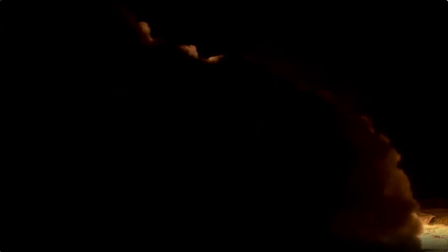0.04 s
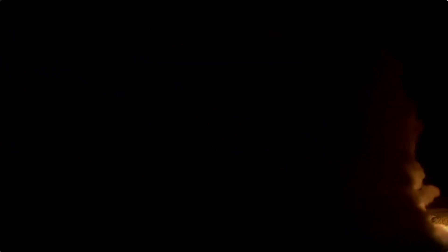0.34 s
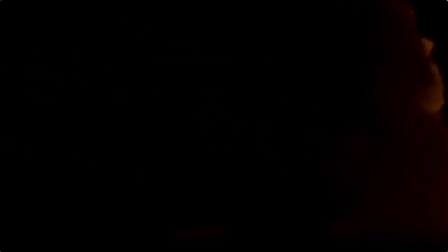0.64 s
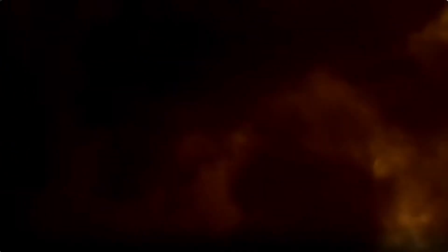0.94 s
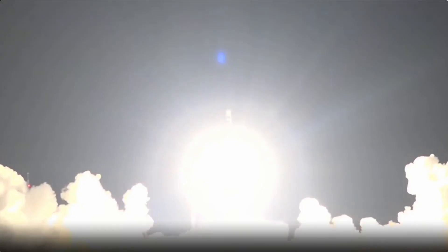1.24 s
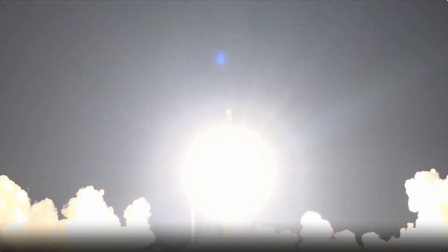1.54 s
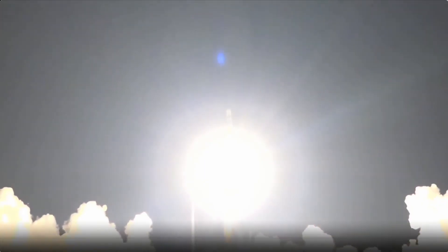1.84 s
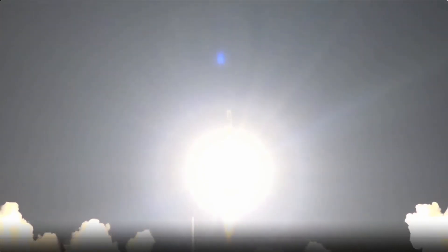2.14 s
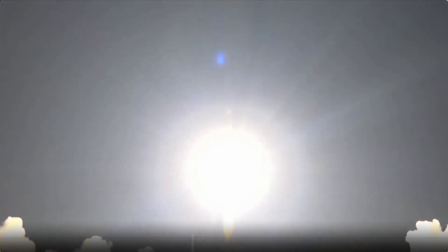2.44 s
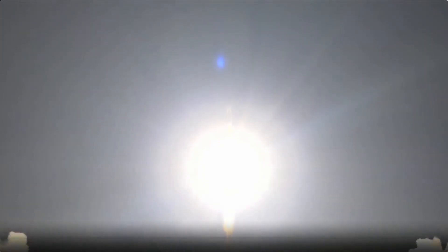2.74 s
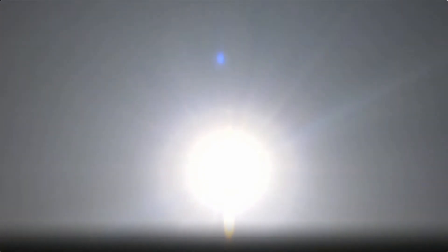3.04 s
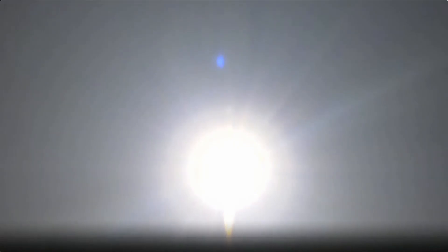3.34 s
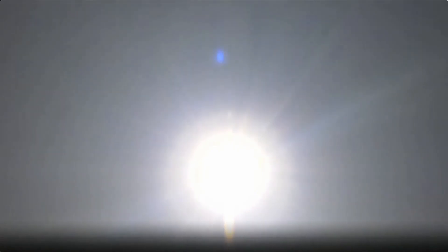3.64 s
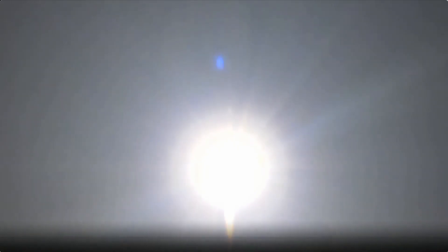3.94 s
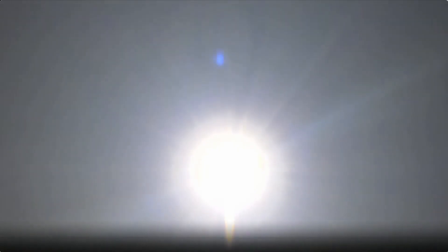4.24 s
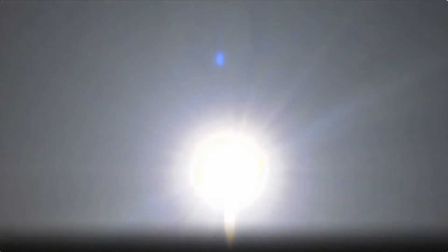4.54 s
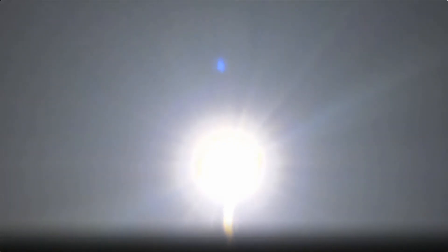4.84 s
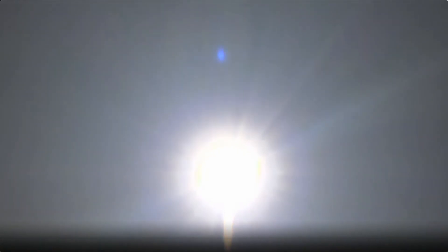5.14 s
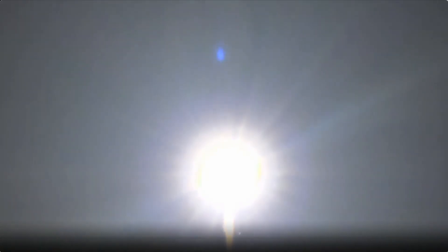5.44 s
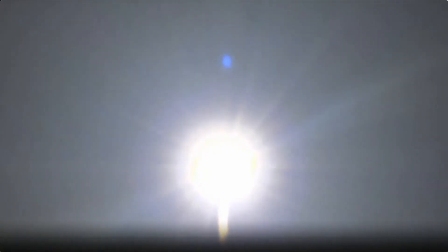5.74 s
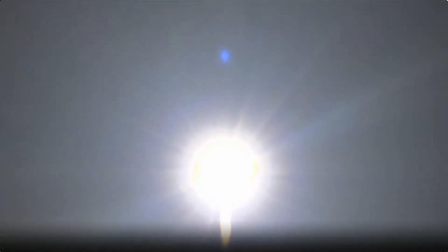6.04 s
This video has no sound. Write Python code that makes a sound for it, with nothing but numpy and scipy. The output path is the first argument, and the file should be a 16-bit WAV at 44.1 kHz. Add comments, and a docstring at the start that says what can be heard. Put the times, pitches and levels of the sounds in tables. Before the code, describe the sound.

A rocket's engines roar at liftoff outdoors, heard through an overloaded microphone. The rushing noise starts with a pop, cuts out after about a second and stutters back with a few more pops. It then runs unbroken, growing fuller and deeper as the rocket clears the steam. Sharp crackles and brief low thumps run through the roar, and its tone sweeps slowly downward.

```python
"""A rocket's exhaust roars as it lifts off at night, at first scattered by the pad and the steam cloud,
then more and more directly, crackling with small shocks (sudden jumps in air pressure). The echo off
the ground lags further as the rocket climbs, so the roar's tone sweeps down. A fast limiter holds the
overloaded microphone's level down; early on the signal keeps cutting out and coming back with a pop."""
import sys
import numpy as np
from scipy import signal
from scipy.fft import rfft, irfft, next_fast_len
from scipy.io import wavfile
from scipy.ndimage import uniform_filter1d, minimum_filter1d, map_coordinates

SR = 44100
rng = np.random.default_rng(int(sys.argv[2]) if len(sys.argv) > 2 else 0)


def master_out(mix):
    """Clip the mix to full scale and print it as 16-bit PCM to the path in sys.argv[1]."""
    frames = np.transpose(np.atleast_2d(mix))
    ceiling = np.clip(frames, -1, 1)
    pcm = np.round(ceiling * 32767).astype(np.int16)
    wavfile.write(sys.argv[1], SR, pcm)


N = 269010
TOP_HZ = 15600  # the treble ends here


def exhaust():
    """The roar: the jet of hot gas rises out of the steam, and each band of pitch has its own loudness."""
    # the climb: (time [s], share of the sound that arrives directly [0-1], ground echo lag [ms])
    climb = [(.1, 0.1, 2.83), (1.5, 0, 2.94), (2.3, 0.12, 3), (3.0, 0.39, 3.42), (3.65, 0.48, 3.82),
             (3.9, .5, 4.34), (4.2, 0.54, 4.42), (4.6, 0.64, 4.97), (5.0, .72, 5.34), (5.4, 0.82, 5.7),
             (6.1, 0.91, 6.03)]
    # the roar's tone before each band's loudness is set: (frequency [Hz], level [dB])
    tone = [(15, -29), (42, -18.5), (80, -2), (150, 3.5), (300, -1.5), (500, -6), (860, -11.5), (1100, -14),
            (2400, -21.5), (3300, -23.5), (5200, -25), (7200, -27.5), (9000, -34.5), (10800, -34.5),
            (13500, -40.5), (15200, -39.5)]
    # how much louder the left side is: (frequency [Hz], left minus right [dB])
    balance = [(40, 2.5), (130, 2), (400, 3), (1000, 1.2), (3000, 0.5), (12000, 0.5)]
    # where the bands rumble, boom, roar, rush, hiss and fizz end: (upper edge [Hz])
    edges_hz = [75, 150, 700, 3950, 9000, TOP_HZ]
    share, lag_ms = curves(climb)
    roar = np.sqrt(share) * direct_roar(lag_ms) + np.sqrt(1 - share) * scattered_roar()
    roar += low_hump(width_hz=144, strength_db=-23.5)
    lean = lambda hz: amp(np.outer([.5, -.5], along(balance, hz)))
    rest = filtered(roar, lambda hz: keep_sharp(amp(along(tone, hz))) * mic_hollows(hz) * lean(hz))
    out = np.zeros((2, N))
    for edge_hz, db in zip(edges_hz, band_levels()):
        band = filtered(rest, lambda hz: below(hz, edge_hz, order=12))
        rest = rest - band
        power = uniform_filter1d(band.mean(axis=0) ** 2, size=SR // 2)
        out += amp(db) * band / np.sqrt(np.abs(power))  # even the band out, then set its level
    return out


def direct_roar(lag_ms):
    """Swirling gas in the bass and shocks in the treble, heard straight and once more off the ground."""
    # how much the ground reflects: (frequency [Hz], level [dB], capped at 0 below)
    ground = [(90, -6), (130, -7), (185, -1.5), (250, 0.5), (560, -1), (900, -6.5), (1600, -8), (5000, -15)]
    # smooth noise as against shocks: (frequency [Hz], share of noise [0-1])
    smooth = [(200, 0.88), (1000, 0.48), (2500, 0.27), (7000, .08), (13000, 0.39)]
    shocks = crackle(per_second=1250, spread_db=6.0, waver_db=0.86, sides_db=2.0)
    jet = filtered(rng.standard_normal(N), lambda hz: np.sqrt(along(smooth, hz)))
    jet = jet + filtered(shocks, lambda hz: np.sqrt(1 - along(smooth, hz)))
    bounce = filtered(jet, lambda hz: np.minimum(amp(along(ground, hz)), 1))
    delayed_index = np.arange(N) - lag_ms * SR / 1000
    return jet + np.array([map_coordinates(side, [delayed_index]) for side in bounce])


def scattered_roar():
    """Pad and steam scatter the roar, so it comes from all round, blurred into smooth noise."""
    # how they change its tone: (frequency [Hz], level [dB])
    tone = [(35, -16.5), (95, 2.5), (135, -3), (210, -1.5), (340, 1), (520, 1.5), (850, -.5), (3200, 2),
            (5200, 6), (6800, 4), (12000, 6)]
    # how alike the two sides are: (frequency [Hz], likeness [-1 to 1])
    likeness = [(30, .4), (100, 0.68), (300, 0.75), (650, 0.68), (1100, .68), (2000, 0.51), (3900, 0.62),
                (5200, 0.2), (7000, -0.017), (15000, -0.28)]
    angle = lambda hz: np.arccos(along(likeness, hz)) / 2
    gains = lambda hz: amp(along(tone, hz)) * np.array([np.cos(angle(hz)), np.sin(angle(hz))])
    common, opposite = filtered(rng.standard_normal((2, N)), gains)
    return np.array([common + opposite, common - opposite])


def band_levels(emerges_s=0.81, clear_s=1.98, flutters_per_s=17):
    """A dB curve per band: the roar fills out as it clears the steam, then fades, top treble fastest."""
    # the bands, low to high: (level on the pad [dB], level clear of the steam [dB], fade [dB/s],
    # share of the swells [0-1], lift in a rasp [dB], flutter from swirling gas [dB])
    bands = [(-45.5, -45, -0.2, 0.12, 2, 1), (-32.5, -35, -1, 0, 0, 0.35), (-26.5, -20, 0.92, 0, 0, .5),
             (-26.5, -28, 1.25, 0.4, 0.37, 0.43), (-38.5, -42, 0.98, 0.9, -0.3, 0.5),
             (-48, -47.5, 1.95, 0.93, -0.5, 0.5)]
    # the middle of each band: (frequency [Hz])
    centres_hz = [55, 110, 330, 1700, 6000, 12000]
    # the treble swells and sinks in slow waves: (time [s], level [dB])
    swells = [(.35, -1.5), (.75, -2.5), (1.5, -0.5), (2.2, 1), (2.66, 0.3), (2.81, -1.5), (2.95, -2),
              (3.35, -1), (3.52, -2), (3.64, 1), (3.98, -1), (4.15, 1.5), (4.38, 1.5), (4.52, -2),
              (4.74, 0.5), (4.93, 1.5), (5.08, -2.5), (5.22, -3.5), (5.35, 1.2), (5.6, 2), (5.8, 1),
              (5.99, -1), (6.08, 0.5)]
    cleared, = curves([(emerges_s, 0), (clear_s, 1)])
    climb_s = np.maximum(clock() - clear_s, 0)
    swell_db, = curves(swells)
    rasp = rasps()
    levels = []
    for centre_hz, (pad_db, clear_db, fade, share, rasp_db, flutter_db) in zip(centres_hz, bands):
        trend_db = pad_db + (clear_db - pad_db) * cleared - fade * climb_s
        lift_db = share * swell_db + rasp_db * rasp + surges(centre_hz)
        levels.append(trend_db + lift_db + flutter_db * wobble(flutters_per_s))
    return levels


def surges(centre_hz, width_s=0.026, width_octaves=1.1):
    """The lift in dB that the jet's largest swirls briefly give to one band."""
    # passing swirls: (time [s], lift [dB], centre [Hz])
    swirls = [(.4, 4.5, 400), (.84, 8, 600), (.87, 9.5, 59.9), (1.96, 6, 60), (2.53, 1, 330),
              (2.74, 2, 300), (2.96, 4, 250), (3.17, 2.5, 599), (3.37, 11, 70), (3.79, 9, 130),
              (4.02, 7, 55), (4.11, 3, 230), (4.17, 4, 55), (4.3, 5.5, 300), (4.43, 6, 120),
              (4.955, 5, 300), (5.02, 4, 55), (5.16, 1, 119.9), (5.32, 4, 60), (5.54, 6, 90), (5.82, 8, 55),
              (5.98, 4, 160)]
    return sum(db * bell(clock() - s, width_s) * bell(np.log2(hz / centre_hz), width_octaves)
               for s, db, hz in swirls)


def low_hump(width_hz, strength_db):
    """A low hump in the roar's tone that sinks as the ground echo lags further."""
    # its path: (time [s], pitch [Hz], strength [0-1])
    glide = [(1.2, 380, .4), (2.0, 299.9, 0.92), (2.6, 280.3, 0.98), (3.5, 234.6, 1), (4.4, 190, .85),
             (6.1, 150, .4)]
    pitch_hz, strength = curves(glide)
    slow_noise = unit(filtered(rng.standard_normal((2, N)), lambda hz: below(hz, width_hz / 2, order=4)))
    phase = 2 * np.pi * np.cumsum(pitch_hz) / SR
    return amp(strength_db) * strength * (slow_noise[0] * np.cos(phase) + slow_noise[1] * np.sin(phase))


def crackle(per_second, spread_db, waver_db, sides_db):
    """Small shocks of uneven size, all pushing the same way; in a rasp they crowd together."""
    struck = rng.random(N) < (1 + rasps()) * per_second / SR
    size = amp(spread_db * np.clip(rng.standard_normal(N), -2, 2) + waver_db * wobble(45))
    side_gains = amp(sides_db * np.clip(rng.standard_normal((2, N)), -2, 2))
    shocks = -size * struck * side_gains
    return unit(shocks - uniform_filter1d(shocks, size=SR // 50))  # centre the wave on zero


def rasps(width_s=.018):
    """Short volleys of shocks: how many extra ones arrive at each moment."""
    # volleys: (time [s], extra shocks [multiple of the usual rate])
    volleys = [(1.755, 2), (2.16, 1), (2.325, 2), (2.635, 1.6), (3.58, 1.3), (3.675, 1.5), (3.76, 1),
               (4.04, 1.7), (4.14, 1), (4.252, 2.2), (4.739, 2.2), (4.92, 2.2), (5.16, 1.4), (5.43, 1.5),
               (5.63, .5), (5.746, 1.1), (6.085, 1.2)]
    return sum(extra * bell(clock() - s, width_s) for s, extra in volleys)


def cracks(decay_ms, edge_hz):
    """The strongest shocks: a jump of pressure that relaxes at once, its edge dulled by the air."""
    # shocks that stand out of the crackle: (time [s], relative level [dB])
    big_shocks = [(2.1789, -25), (2.3226, -19), (2.6204, -14.5), (2.8778, -16), (2.917, -16), (3.1994, -19),
                  (3.2191, -18), (3.944, -18), (4.332, -25), (4.367, -15), (4.7414, -17), (4.78, -20),
                  (4.8903, -26), (4.9272, -19), (4.9475, -16), (5.1585, -21), (5.1635, -24), (5.294, -15),
                  (5.404, -20), (5.4226, -24), (5.4284, -21), (5.5166, -22), (5.6076, -26), (5.6417, -23),
                  (5.749, -26), (6.0847, -20)]
    jumps = np.zeros(N)
    for s, db in big_shocks:
        jumps[round(s * SR)] = -amp(db)
    shocks = signal.lfilter([1], [1, -np.exp(-1e3 / (decay_ms * SR))], jumps)
    return filtered(shocks, lambda hz: mic_hollows(hz) * below(hz, edge_hz, order=2))


def air_bumps(width_s):
    """Brief pushes of air on the microphone's left side."""
    # pushes: (time [s], height [signed amplitude])
    pushes = [(1.878, -.08), (3.516, 0.11), (3.834, 0.23), (4.471, 0.23)]
    return np.outer([1, 0], sum(height * bell(clock() - s, width_s) for s, height in pushes))


def mic_hollows(hz):
    """The microphone picks up some ranges of pitch more weakly than the rest."""
    # dips: (centre [Hz], width [Hz], depth [0-1])
    dips = [(700, 120, 0.54), (1497, 436, 0.84), (3915, 1520, 0.78)]
    return np.prod([1 - depth * 1j * hz * width / (centre ** 2 - hz ** 2 + 1j * hz * width)
                    for centre, width, depth in dips], axis=0)


def limiter(x, ceiling_db, window_ms):
    """Both sides are turned down for a moment wherever one would pass the ceiling."""
    span = int(window_ms * SR / 1000)
    needed_gain = np.minimum(1, amp(ceiling_db) / (np.abs(x).max(axis=0) + 1e-9))
    return x * uniform_filter1d(minimum_filter1d(needed_gain, span), span)


def dropouts(x, tail_db, tail_s, tail_hz, ring_db, ring_s, ring_hz):
    """The signal cuts out; a dull tail and a faint low ring fall by 60 dB in tail_s and ring_s."""
    # stretches in which the signal gets through: (start [s], end [s])
    live = [(.1325, .9005), (.927, .949), (1.2168, 1.2385), (1.367, 6.2)]
    t = clock()
    out = x * sum((t >= start) & (t < end) for start, end in live)
    dull = filtered(x, lambda hz: 1 / (1 + 1j * hz / tail_hz))
    for _, end in live:
        age = np.maximum(t - end, 0)
        out += dull * (age > 0) * amp(tail_db - 60 * age / tail_s)
        out += np.sin(2 * np.pi * ring_hz * age) * amp(ring_db - 60 * age / ring_s)
    return out


def pops(snap_ms, snap_hz, thump_db, thump_hz, thump_ms):
    """Each time the signal returns it snaps, briefly swings too far and settles with a low thump."""
    # returns: (time [s], swing size [signed gain], pitch [Hz], decay [ms], snap before dulling [dB])
    returns = [(0.1325, -1.17, 2190, 0.43, -5), (.927, -0.15, 650, 3.2, -18),
               (1.2165, 0.68, 600, 0.48, -1.5), (1.367, -0.43, 1090, 0.69, -3)]
    swing, snap = np.zeros(N), np.zeros((2, N))
    for s, size, hz, decay_ms, snap_db in returns:
        age = np.maximum(clock() - s, 0)
        age_ms = age * 1e3
        swing += size * np.sin(2 * np.pi * hz * age) * bell(age_ms, decay_ms)
        swing += size * amp(thump_db) * np.sin(2 * np.pi * thump_hz * age) * np.exp(-age_ms / thump_ms)
        snap += amp(snap_db) * rng.standard_normal((2, N)) * np.exp(-age_ms / snap_ms) * (age > 0)
    return swing + filtered(snap, lambda hz: mic_hollows(hz) / (1 + 1j * hz / snap_hz) ** 2)


def amp(db):
    """Turns decibels into a number to multiply by."""
    return 10 ** (np.asarray(db) / 20)


def unit(x):
    """Scales a signal to an average power of 1."""
    return x / np.sqrt(np.mean(x ** 2) + 1e-20)


def bell(distance, width):
    """A smooth hump, 1 high where the distance is zero."""
    return np.exp(-(distance / width) ** 2)


def along(points, hz):
    """Reads between (frequency, value) points, with octaves evenly spaced."""
    frequencies, values = np.transpose(points)
    return np.interp(np.log(hz + 1), np.log(frequencies + 1), values)


def clock():
    """The time of every sample in seconds."""
    return np.arange(N) / SR


def curves(rows):
    """One value per sample for each column after the time."""
    times, *columns = np.transpose(rows)
    return [np.interp(clock(), times, column) for column in columns]


def wobble(rate):
    """A smooth curve through `rate` random points a second."""
    return map_coordinates(rng.standard_normal(int(N * rate / SR) + 4), [clock() * rate])


def filtered(x, response):
    """Multiplies each frequency in x by response(hz)."""
    size = 2 * next_fast_len(N // 2 + SR // 4)
    return irfft(rfft(x, size) * response(np.fft.rfftfreq(size, 1 / SR)), size)[..., :N]


def keep_sharp(gain):
    """A filter with this gain that never rings ahead of a shock (minimum phase)."""
    cepstrum = irfft(np.log(gain))
    half = len(cepstrum) // 2
    cepstrum[1:half] *= 2
    cepstrum[half + 1:] = 0
    return np.exp(rfft(cepstrum))


def below(hz, edge_hz, order):
    """A gain that lets low frequencies through; a higher order cuts more steeply."""
    return 1 / (1 + (hz / edge_hz) ** order)


def scene():
    """The exhaust, its strongest shocks and the air it throws at the microphone."""
    return exhaust() + amp(7.5) * cracks(decay_ms=0.21, edge_hz=9500) + air_bumps(width_s=0.0024)


def record(dry):
    """The electronics limit the sound, cut out, overload on the pops and add a trace of hiss."""
    held = limiter(dry, ceiling_db=-11.5, window_ms=4.62)
    broken = dropouts(held, tail_db=-13, tail_s=0.034, tail_hz=7000,
                      ring_db=-41, ring_s=0.078, ring_hz=260)
    hiss = amp(-85.5) * rng.standard_normal((2, N)) + amp(-75)  # with a tiny steady offset
    popping = broken + pops(snap_ms=0.55, snap_hz=7600, thump_db=-15, thump_hz=270, thump_ms=2.4)
    clipped = np.clip(popping, -.85, .85)
    return filtered(clipped + hiss, lambda hz: below(hz, TOP_HZ, order=120))


dry = scene()
out = record(dry)
master_out(out)
```